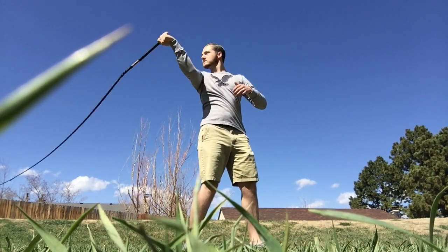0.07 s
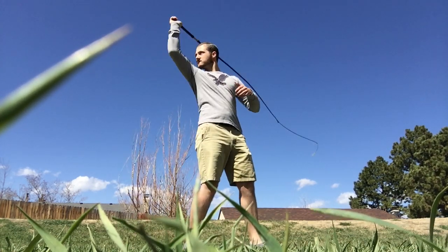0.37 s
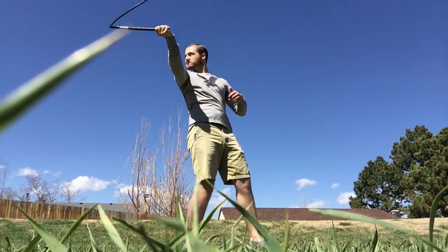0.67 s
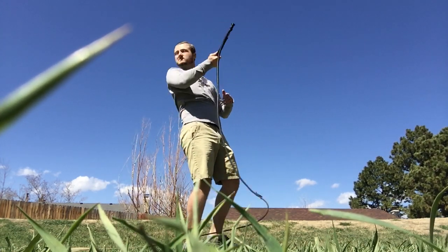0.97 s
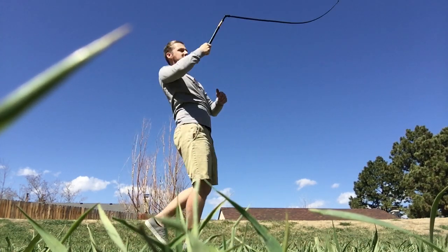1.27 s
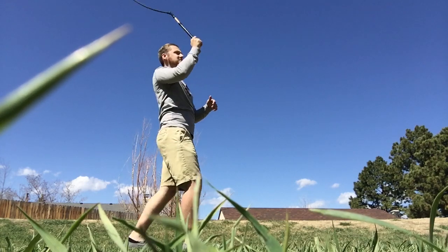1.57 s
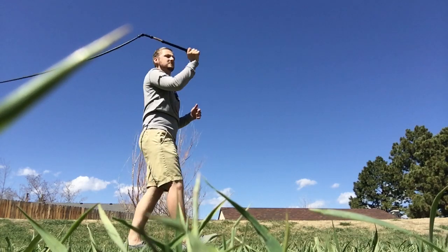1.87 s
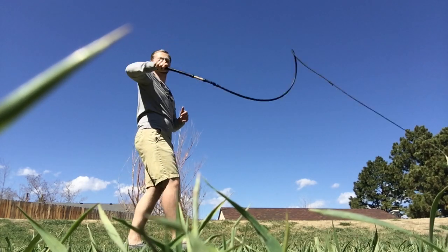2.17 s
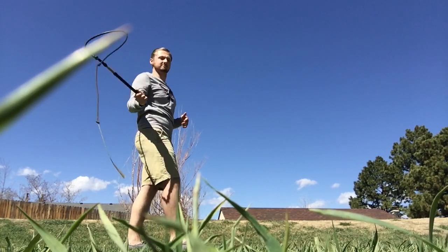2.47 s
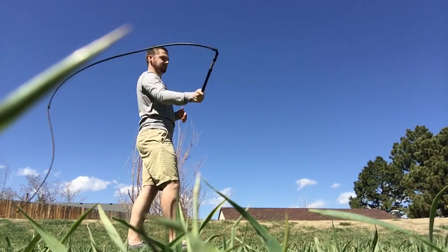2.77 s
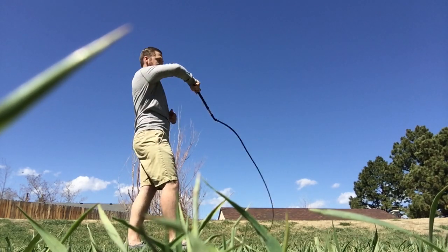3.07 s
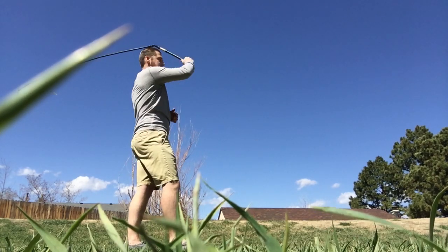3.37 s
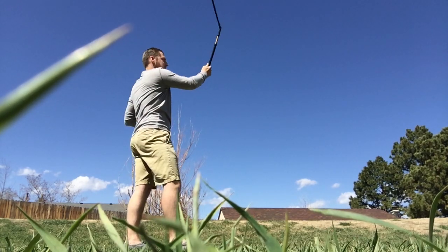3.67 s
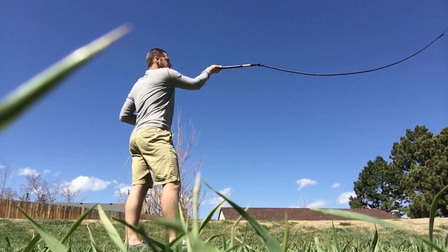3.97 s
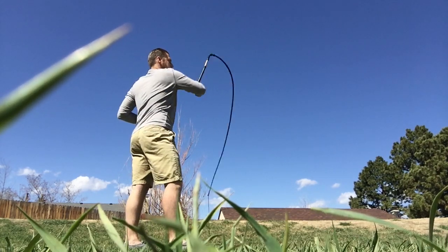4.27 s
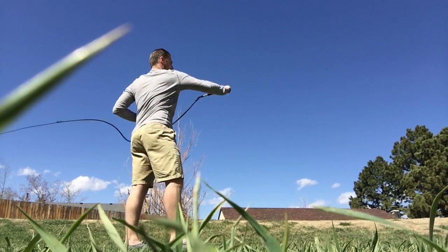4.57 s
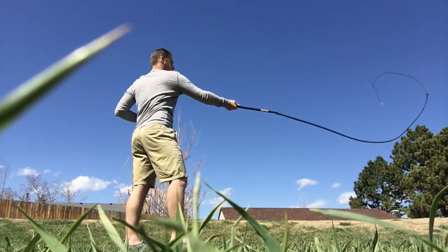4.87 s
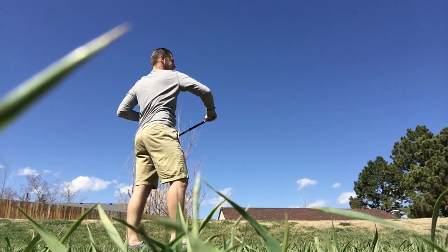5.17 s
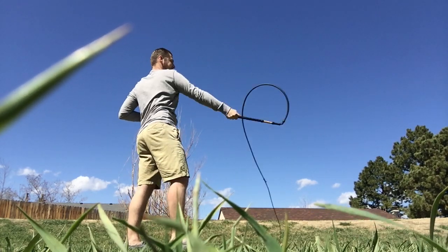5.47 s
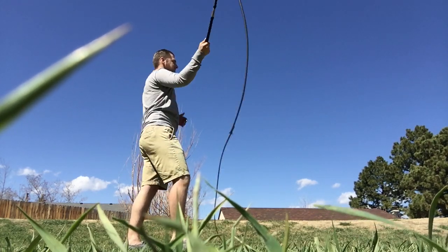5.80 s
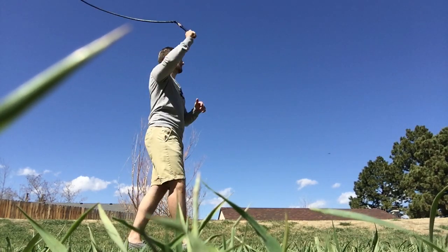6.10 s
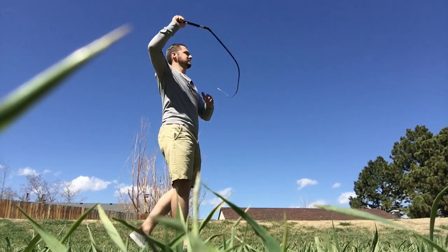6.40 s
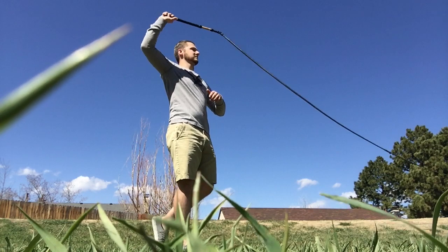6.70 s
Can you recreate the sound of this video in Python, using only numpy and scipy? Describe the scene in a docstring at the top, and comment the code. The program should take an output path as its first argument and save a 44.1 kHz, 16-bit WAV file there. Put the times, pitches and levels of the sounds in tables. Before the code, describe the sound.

A long whip is swung on a lawn, a few metres from a microphone in the grass, over very quiet open air. A soft swish rises into a sharp crack at about 1 second, with a quick echo off nearby houses. Faint whistling swings lead to two more cracks at 2.4 and 2.8 seconds. Around 3.1 seconds comes a zipping swish with two much weaker snaps, then soft low whooshes. Four cracks follow in a run at 4.6, 5.0, 5.4 and 5.7 seconds, the one at 5.0 the loudest of all. Each has a brief falling whistle and a short, duller echo. A light breeze rumbles faintly on the microphone, strongest from about 5.5 seconds, where several soft low thumps join it. A last whoosh near 6 seconds and a faint tick leave only the breeze until about 6.8 seconds.

```python
"""Stockwhip on a lawn.

A stockwhip is swung and cracked a few metres from a microphone lying in the grass. The lash sings
as it sheds vortices, rising to each crack and sinking after it. The cracks are shocks from its
supersonic tip, thrown back by fence, houses and trees. Behind it is quiet open air with a few
low thumps, and a breeze buffets the microphone, hardest near the end."""
import sys
import numpy as np
from scipy import signal
from scipy.fft import rfft, irfft
from scipy.io import wavfile
from scipy.ndimage import map_coordinates

SR = 44100
rng = np.random.default_rng(int(sys.argv[2]) if len(sys.argv) > 2 else 0)


def generate_wav(sig):
    """Save sig (samples, or channels by samples) to the path in sys.argv[1] as 16-bit PCM at SR."""
    pcm = np.round(np.clip(np.atleast_2d(sig).T, -1, 1) * 32767).astype(np.int16)
    wavfile.write(sys.argv[1], SR, pcm)


N = 301644

# Cracks at the microphone: (time [s], energy [dB], body [Hz], brightness [dB/octave],
# ground bounce delay [ms], bounce [dB], tip hiss [dB re crack], aim at the yard [dB])
CRACKS = [(0.952, 8, 170, 0.64, 2.53, -12.5, -17.5, 14.5), (2.3586, 7.5, 293, -0.4, 3.2, -4.5, -14, 2.5),
          (2.7531, 5.5, 274, -1.8, 3.14, -11, -18.5, 4.5), (3.0545, -12, 300, 1.5, 3.1, -13, -8.5, -8),
          (3.0904, -9.5, 500, -3.5, 0.76, -6.5, -18, 22), (4.622, 1, 258, 0.4, 0.64, -5, -8, 1.5),
          (5.0071, 12.5, 678, -1, 1.03, -13.5, -26, 0), (5.3969, 4, 232, -1.5, 1.47, -3, -15, -3),
          (5.739, -1.5, 372.5, 1.6, 0.75, -8.5, -12, 8)]


def amp(db):
    """Decibels to gain."""
    return 10 ** (np.asarray(db) / 20)


def unit(x):
    """Scales to an rms of one."""
    return x / np.sqrt(np.mean(abs(x) ** 2) + 1e-20)


def spectrum_db(points, hz):
    """Reads (frequency, level) points on a log-frequency axis."""
    point_hz, db = np.transpose(points)
    return np.interp(np.log(hz + 1), np.log(point_hz), db)


def bins(size):
    """Frequencies in the spectrum of this many samples."""
    return np.fft.rfftfreq(size, 1 / SR)


def add(mix, s, sound):
    """Mixes a sound in at s seconds."""
    part = mix[max(round(s * SR), 0):][:len(sound)]
    part += sound[:len(part)]


def minimum_phase(db):
    """The causal frequency response with this gain."""
    log_gain = np.log(amp(np.maximum(db, -100)))
    mirrored = np.r_[log_gain, log_gain[-2:0:-1]]
    return np.exp(np.conj(signal.hilbert(mirrored)))[:len(db)]


def drift(steps, size=4096):
    """A smooth random curve that takes a new value at every whole step."""
    return map_coordinates(rng.standard_normal(size), [steps], order=3, mode="wrap")


def bell(t, length):
    """A smooth rise and fall around time zero."""
    return np.exp(-(2 * t / length) ** 2)


def hiss_band(centre_hz, octaves, size):
    """Noise in one band, bell-shaped in log frequency."""
    band = np.exp(-.5 * (np.log2((bins(size) + 1) / centre_hz) / octaves) ** 2)
    return unit(irfft(rfft(rng.standard_normal(size)) * band))


def open_air():
    """A distant wash with a fine hiss on top, swelling slowly."""
    # Colour of the background: (frequency [Hz], level [dB])
    colour = [(18, -36), (30, -11.5), (81, -8.5), (109, -7.5), (138, -3), (174, -3), (239, -13), (311, -8),
              (355, -16.5), (384, -15.5), (632, -15.5), (1010, -19), (2480, -30), (6900, -34), (16000, -45)]
    # Its slow swell: (time [s], gain [dB])
    swell_curve = [(0, 1), (.6, -0.5), (1.3, 3), (1.799, 0.5), (2.6, 2), (3.8, 2), (4.5, 2), (6.8, 1)]
    hz = bins(N)
    wash = rfft(rng.standard_normal(N)) * amp(spectrum_db(colour, hz))
    swell = amp(np.interp(np.arange(N) / SR, *np.transpose(swell_curve)))
    rms_above_rumble = np.std(irfft(wash * (hz > 300), N))
    return amp(-68) * swell * irfft(wash, N) / rms_above_rumble


def breeze(lumps_per_s=24, lump_db=4.0):
    """Eddies bump against the microphone in low lumps, harder in the gusts."""
    # Colour of wind on the microphone: (frequency [Hz], level [dB])
    colour = [(20, -26.5), (40, -9.5), (70, 1.5), (140, -2.5), (220, -5.5), (400, -21), (1000, -47.5),
              (4000, -66.5)]
    # Strength of the breeze: (time [s], level [dB])
    strength = [(0, -60.5), (.5, -75), (1.1, -62), (1.6, -75), (2.3, -62.5), (3.1, -54), (3.8, -67),
                (5.2, -56.5), (6.8, -54.5)]
    # Gusts and one lull on top of it: (time [s], rise [dB], length [s])
    gusts = [(5.464, 8, 0.13), (5.563, 9, 0.059), (5.81, 5, 0.11), (5.98, 14, 0.056), (6.37, -2.5, 0.12)]
    t = np.arange(N) / SR
    rumble = irfft(rfft(rng.standard_normal(N)) * amp(spectrum_db(colour, bins(N))), N)
    db = np.interp(t, *np.transpose(strength))
    db += sum(rise * bell(t - s, length) for s, rise, length in gusts)
    lumps = amp(lump_db * np.tanh(drift(t * lumps_per_s)))
    return amp(db) * unit(rumble * lumps)


def vortex_tone(hz, cycles, skirt_db):
    """Vortices peel off a moving cord at a rate set by its speed, in step for only a few cycles."""
    turns = np.cumsum(hz) / SR
    # a faster cord leaves a more turbulent wake: the tone loses step sooner and gains a rough skirt
    haste = np.clip(hz / 850, 1, 1.9)
    steps = np.cumsum(hz * haste) / SR / cycles
    core = drift(steps) + 1j * drift(steps)
    core /= np.sqrt(abs(core) + .5)
    skirt = drift(turns * .8) + 1j * drift(turns * 0.86)
    rough = amp(skirt_db) * haste
    wake = (unit(core) + rough * unit(skirt)) / np.hypot(1, rough)
    return unit((wake * np.exp(2j * np.pi * turns)).real)


def swish(hz, cycles, skirt_db, thong_db, cracker_db, flutter_per_s=130):
    """The lash sings; the thick thong hums an octave below, the thin cracker whistles an octave above."""
    lash = vortex_tone(hz, cycles, skirt_db)
    thong = amp(thong_db) * vortex_tone(hz / 2, cycles=2, skirt_db=-3)
    cracker = amp(cracker_db) * vortex_tone(hz * 2, cycles=10, skirt_db=-13)
    # waves running down the cord make its song flutter
    flutter = unit(amp(3 * drift(np.arange(len(hz)) / SR * flutter_per_s)))
    return (lash + thong + cracker) * flutter


def swings(skirt_db=-10):
    """Between cracks the lash circles at a lower speed and whistles more cleanly."""
    # Slow swings: (time in step [cycles], thong [dB re lash], cracker [dB re lash],
    # curve of (time [s], pitch [Hz], level [dB]))
    arcs = [(1.5, -8.5, -26, [(0.0, 625, -47.5), (0.028, 688, -48), (0.074, 697, -51), (0.1, 639, -58),
            (0.18, 654, -69)]), (7.96, -7, -21, [(0.77, 652, -60), (0.79, 591, -62), (0.818, 619, -54),
            (0.85, 814, -40), (0.9, 870, -53), (0.914, 860, -50), (0.924, 700, -42), (0.934, 800, -36),
            (0.94, 802, -45)]), (10.7, -14, -21, [(1.35, 496, -67), (1.392, 734, -51.5), (1.436, 518, -51),
            (1.47, 483, -77)]), (12, -25, -31, [(2.04, 575, -72), (2.056, 518, -71), (2.092, 626, -53.5),
            (2.098, 732, -54.5), (2.184, 531, -43), (2.224, 521, -46), (2.236, 740, -53),
            (2.26, 624, -81)]), (5.15, -12, -17.5, [(2.85, 790, -52.5), (2.896, 634, -48.5),
            (2.904, 806, -46.5), (2.95, 615, -70)]), (5, -18, -19, [(3.44, 911, -76), (3.478, 907, -50),
            (3.526, 823, -66), (3.55, 840, -68)]), (3.1, 0.5, -28, [(4.17, 504, -68), (4.198, 491, -54.5),
            (4.226, 754, -60), (4.24, 837.3, -58), (4.254, 762, -51), (4.33, 396, -65)]),
            (3.1, -12, -37, [(4.74, 644, -68), (4.78, 654, -46.5), (4.804, 535, -50), (4.898, 652, -53),
            (4.912, 610, -59), (4.94, 749, -74)])]
    out = np.zeros(N)
    for cycles, thong_db, cracker_db, curve in arcs:
        s, hz, db = np.transpose(curve)
        t = np.arange(s[0], s[-1], 1 / SR)
        envelope = amp(np.interp(t, s, db)) * signal.windows.tukey(len(t), .1)
        song = swish(np.interp(t, s, hz), cycles, skirt_db, thong_db, cracker_db)
        add(out, s[0], envelope * song)
    return out


def passes(thong_hz=301.9, thong_cycles=2, size=16384):
    """One stretch of cord sweeps by the microphone: a gliding tone that swells and fades."""
    # Passes of thong or thin end: (time [s], level [dB], length [s], pitch [Hz], glide [octaves/s])
    sweeps = [(.03, -66, .06, 280, -2), (.875, -48, 0.13, 340, 0.5), (0.891, -50.5, 0.024, 1880, -3.5),
              (1.175, -55, .07, 200, -1), (1.286, -60.5, 0.035, 950, 0), (2.261, -64, 0.012, 1270, -5.5),
              (2.338, -53, 0.058, 299.5, 10.5), (2.503, -59, 0.077, 700, -5), (2.567, -58.5, .05, 480, -4),
              (2.7, -48.5, 0.032, 220, 2.5), (2.932, -51.5, 0.015, 1340, -3), (3.024, -44, 0.05, 320, 12.5),
              (3.082, -34.5, .014, 1550, 12.5), (3.094, -39, .011, 4530, -26.5),
              (3.194, -56, 0.13, 330, -4.5), (3.309, -48.5, 0.22, 280, -2), (4.251, -57, 0.14, 400, -1),
              (4.412, -59, 0.12, 270, -2.5), (5.191, -52, 0.049, 280, -5), (5.445, -43, 0.017, 1447, 0),
              (5.686, -53.5, 0.057, 290, 5.5), (5.871, -55, 0.099, 560, -9), (5.968, -50, 0.15, 290, -5)]
    out, t = np.zeros(N), (np.arange(size) - size / 2) / SR
    for s, db, length, hz, glide in sweeps:
        # a thinner cord sings higher and stays in step for more cycles
        tone = vortex_tone(hz * 2 ** (glide * t), thong_cycles * hz / thong_hz, skirt_db=-11.5)
        add(out, s + t[0], amp(db) * tone * bell(t, length))
    return out


def thumps(cycles=0.54, size=8192):
    """Each thump is a soft push of air that swings only once or twice."""
    # Footfalls and gusts: (time [s], peak [dB], pitch [Hz])
    pushes = [(0.362, -45, 70), (1.586, -46.5, 158), (4.013, -48.5, 180), (5.502, -39, 57.5),
              (5.582, -35, 74), (5.881, -35, 120), (5.984, -37, 89.9), (6.165, -34.5, 160),
              (6.361, -40, 132), (6.58, -43.5, 140), (6.67, -45.5, 60)]
    out, t = np.zeros(N), (np.arange(size) - size / 2) / SR
    for s, db, hz in pushes:
        envelope = np.exp(-(t * hz / cycles) ** 2)
        add(out, s + t[0], -amp(db) * np.cos(2 * np.pi * hz * t) * envelope)
    return out


def brushes(size=16384):
    """The whip in the grass and cracks scattered by trees arrive as smooth swells of hiss."""
    # Hissing swells: (time [s], level [dB], length [s], centre [Hz], spread [octaves])
    swells = [(.875, -68, 0.077, 2980, 0.67), (1.046, -56, 0.046, 5700, 0.57),
              (1.097, -51.5, 0.023, 3540, 0.62), (1.134, -59, 0.073, 2960, 0.74),
              (1.426, -55.5, 0.0061, 4160, 0.15), (2.436, -55, 0.029, 2467, 0.3),
              (2.514, -65.5, 0.076, 2740, 0.32), (2.836, -62, 0.043, 4500, 0.58),
              (4.69, -42, 0.026, 4300, 0.78), (4.724, -49.5, 0.038, 4670, 0.7),
              (4.762, -66.5, .072, 4300, 0.69)]
    out, t = np.zeros(N), (np.arange(size) - size / 2) / SR
    for s, db, length, centre_hz, spread in swells:
        add(out, s + t[0], amp(db) * hiss_band(centre_hz, spread, size) * bell(t, length))
    return out


def throws(size=16384, lead=2048):
    """The lash shoots up to top speed, coasts and slows unevenly; pitch, loudness and hiss follow."""
    # Throws of the lash: (time of top speed [s], top pitch [Hz], slowing time [s],
    # coasting [1 slows at once, 2 holds its speed first], level [dB], song length [s],
    # thong [dB re lash], cracker at top speed [dB re lash], hiss [dB re lash])
    strokes = [(0.947, 1887, 0.052, 1.4, -40.5, 0.053, -11, -3.5, -10),
               (2.357, 1805, 0.09, 1, -50.5, 0.11, -2, -25, -14),
               (2.746, 1740, 0.1, 0.98, -44.5, 0.061, -7, -15, -16),
               (3.05, 2513, 0.031, 0.75, -32.5, 0.035, -13.5, -9.5, -17.5),
               (3.092, 1901, 0.045, 1.27, -35.5, 0.048, -12, -24, -29),
               (4.618, 1636, 0.078, 1.2, -40.5, 0.057, -9.5, -13, -23),
               (5.004, 1759, .13, 1.8, -36.5, 0.1, -14, -11.5, -26.5),
               (5.395, 1616, .11, 1.4, -41.5, 0.081, -15, -4.5, -22),
               (5.734, 1846, .1, 0.95, -34.5, .1, -14.5, -16, -29)]
    run_up_s, rest_hz = .006, 179.5
    song_db_per_octave, hiss_db_per_octave = 3.5, 3
    wobble_octaves, wobble_per_s = .08, 120
    cycles, skirt_db = 6, -8  # at full speed the song is ragged
    cracker_fade_db_per_s = 130.5  # the light cracker loses its speed first
    out, t = np.zeros(N), (np.arange(size) - lead) / SR
    run_up, after = np.exp(np.minimum(t, 0) / run_up_s), np.maximum(t, 0)
    for s, top_hz, slowing, coast, db, length, thong_db, cracker_db, hiss_db in strokes:
        speed = np.sqrt(run_up) * np.exp(-(after / slowing) ** coast)
        hz = rest_hz + (top_hz - rest_hz) * speed
        octaves = np.log2(hz / top_hz)
        wobble = 2 ** (wobble_octaves * drift(after * wobble_per_s))
        song = swish(hz * wobble, cycles, skirt_db, thong_db, cracker_db - cracker_fade_db_per_s * after)
        song *= amp(song_db_per_octave * octaves)
        hiss = hiss_band(centre_hz=4450, octaves=0.98, size=size)
        hiss *= amp(hiss_db + hiss_db_per_octave * octaves)
        envelope = run_up * np.exp(-(after / length) ** 3)
        add(out, s + t[0], amp(db) * envelope * (song + hiss))
    return out


def shocks(lag_cycles=.5, lag_hz=650, bounce_dull_hz=7000, size=4096, lead=256):
    """The supersonic tip sends a shock with a suction behind it, then its duller bounce off the lawn."""
    # Colour of a crack heard from the grass: (frequency [Hz], level [dB])
    crack_colour = [(25, -35), (60, -5.5), (130, 2), (280, 5), (700, 4), (1300, 2), (2500, -1), (3800, -1),
                    (5400, 3.5), (6800, 2.5), (8300, -11.5), (10300, -14), (12500, -1.5), (16000, -11)]
    out, hz = np.zeros(N), bins(size)
    # the bass trails the treble, so each crack ends in slower swings
    bass_lag = np.exp(-2j * np.pi * lag_cycles * np.log(1 + hz / lag_hz))
    colour = minimum_phase(spectrum_db(crack_colour, hz)) * bass_lag
    for s, db, body_hz, brightness, bounce_ms, bounce_db, *_ in CRACKS:
        pulse = 1j * hz / (body_hz + 1j * hz) ** 2
        delay = np.exp(-2j * np.pi * hz * bounce_ms / 1000)
        bounce = amp(bounce_db) * delay / (1 + 1j * hz / bounce_dull_hz)
        tilt = minimum_phase(brightness * np.log2(hz + 100))
        wave = irfft(pulse * (1 + bounce) * colour * tilt)
        wave = np.roll(wave, lead) * signal.windows.tukey(size, 2 * lead / size)
        add(out, s - lead / SR, amp(db) * wave / np.linalg.norm(wave))
    return out


def tip_hiss(width_s=0.0025, base_hz=300, rise_hz=5000, glide_s=0.0016, air_db=-1, air_hz=7000):
    """The frayed tip shrieks up to top speed at each shock, tearing the air, and slows again at once."""
    size = 2048
    out, t = np.zeros(N), (np.arange(size) - size / 2) / SR
    hz = base_hz + rise_hz / np.hypot(1, t / glide_s)
    for s, db, *_, hiss_db, _ in CRACKS:
        torn_air = unit(irfft(rfft(rng.standard_normal(size)) / (1 + 1j * bins(size) / air_hz)))
        shriek = vortex_tone(hz, cycles=4, skirt_db=-8.5)
        hiss = (shriek + amp(air_db) * torn_air) * np.exp(-abs(t) / width_s)
        add(out, s + t[0], amp(db + hiss_db) * hiss / np.linalg.norm(hiss))
    return out


def yard_scatter(cracks, build_s=0.0045):
    """Nearby grass scatters each crack at once; the wider yard adds a faint, duller tail."""
    # Layers of scattered sound: (gain [dB], decay [s], thin below [Hz], dull above [Hz])
    layers = [(-19, 0.0013, 500, 12000), (-28, 0.018, 1900, 16000), (-27, 0.03, 310, 2900)]
    t, hz = np.arange(SR) / SR, bins(SR)
    tail = np.zeros(SR)
    for db, decay, low_hz, dull_hz in layers:
        taps = rng.standard_normal(SR) * np.exp(-t / decay) * (1 - np.exp(-t / build_s))
        band = 1j * hz / (low_hz + 1j * hz) / (1 + 1j * hz / dull_hz)
        tail += amp(db) * irfft(rfft(taps / np.linalg.norm(taps)) * band, SR)
    s, *_, aim_db = np.transpose(CRACKS)
    aim = amp(np.interp(np.arange(N) / SR, s, aim_db))
    return signal.fftconvolve(cracks * aim, tail)[:N]


def clatter(db, decay, dull_hz, click_share, size=8192, count=4):
    """A short run of clicks in a smear of noise; distance takes away the treble."""
    # Colour of echoes and snaps: (frequency [Hz], level [dB])
    colour = [(30, -67), (90, -41), (160, 0.5), (300, 4), (1200, 0), (2500, -5.5), (4500, -8.5),
              (9000, -12), (16000, -17)]
    t, hz = np.arange(size) / SR, bins(size)
    smear = rng.standard_normal(size) * np.exp(-t / decay) * (1 - np.exp(-4 * t / decay))
    clicks, k = np.zeros(size), np.arange(count)
    click_s = k * .45 * decay * rng.uniform(.8, 1.2, count)
    clicks[(click_s * SR).astype(int)] = amp(-1.2 * k ** 2)
    taps = np.sqrt(1 - click_share) * unit(smear) + np.sqrt(click_share) * unit(clicks)
    dull_db = -10 * np.log10(1 + (hz / dull_hz) ** 8 / (1 + (hz / dull_hz / 2) ** 6))
    wave = irfft(rfft(taps) * minimum_phase(spectrum_db(colour, hz) + dull_db))
    return amp(db) * np.sqrt(decay * SR) * wave / np.linalg.norm(wave)


def echoes():
    """The louder cracks come back off the houses, each with the same pattern of lesser echoes."""
    # Main echoes off the houses: (time [s], level [dB], decay [s], dull above [Hz],
    # share of clicks [0-1], gain of the lesser echoes [dB])
    houses = [(1.024, -24.5, 0.0017, 7900, 0.6, -2.5), (2.433, -37.5, 0.0078, 3573, 0.5, -9.5),
              (2.8248, -41, 0.0095, 3230, 0.64, -14), (4.694, -41.5, 0.005, 4500, .4, -12.5),
              (5.0849, -39, 0.0063, 3660, 0.84, -16.5), (5.469, -55.5, 0.011, 3830, .39, -26),
              (5.818, -41, 0.0042, 2183, 0.8, -18)]
    # Lesser echoes off fence and trees: (offset from the main echo [s], level before that gain [dB],
    # decay [s], dull above [Hz], share of clicks [0-1])
    fence_and_trees = [(-.02, -32.5, 0.00537, 696, 0.86), (.007, -39.5, .013, 1840, .6),
                       (.026, -40.5, 0.0088, 2500, 0.8), (.092, -45, .007, 3800, 0.5),
                       (.132, -51, .0091, 3100, .53), (0.176, -56, .0024, 5910, 0.5)]
    out = np.zeros(N)
    for s, *main, lesser_db in houses:
        add(out, s, clatter(*main))
        for offset, *lesser in fence_and_trees:
            add(out, s + offset, amp(lesser_db) * clatter(*lesser))
    return out


def snaps():
    """The lash turns over too slowly to crack and only ticks."""
    # Ticks of the lash: (time [s], level [dB], decay [s], dull above [Hz], share of clicks [0-1])
    ticks = [(1.426, -48.5, 0.00185, 7300, 0.8), (6.158, -51, 0.011, 3630, .3)]
    out = np.zeros(N)
    for s, *tick in ticks:
        add(out, s, clatter(*tick))
    return out


def scene():
    """Whip, yard and weather at one microphone in the grass."""
    cracks = shocks() + tip_hiss()
    whip = cracks + yard_scatter(cracks) + echoes() + snaps() + brushes() + throws() + swings() + passes()
    return (whip + open_air() + breeze() + thumps())[None]


def record(dry, low_hz=33, ceiling=.88, edge_hz=16400):
    """The recorder's low cut, its overload on the loudest crack, and its band limit."""
    cut = signal.sosfilt(signal.butter(4, low_hz, "high", fs=SR, output="sos"), dry)
    limited = cut / (1 + (cut / ceiling) ** 8) ** (1 / 8)
    band_limit = signal.firwin(511, edge_hz, window=("kaiser", 9), fs=SR)
    return signal.oaconvolve(limited, band_limit[None], "same")


dry = scene()
out = record(dry)
generate_wav(out)
```